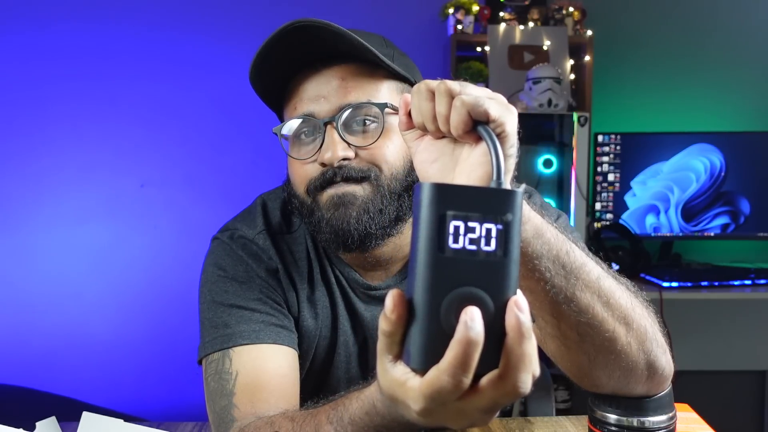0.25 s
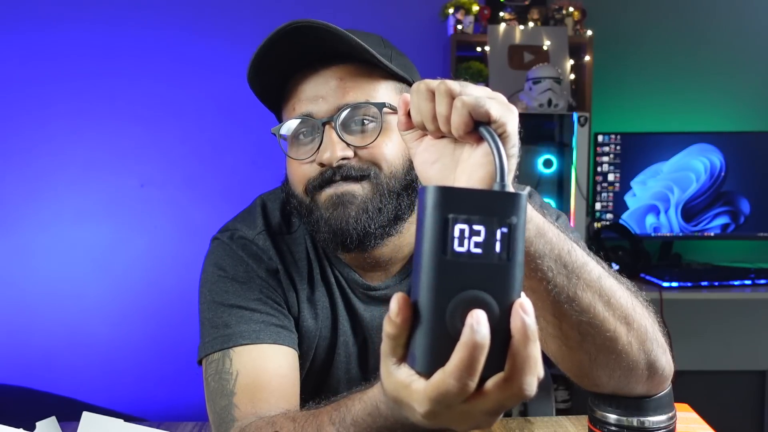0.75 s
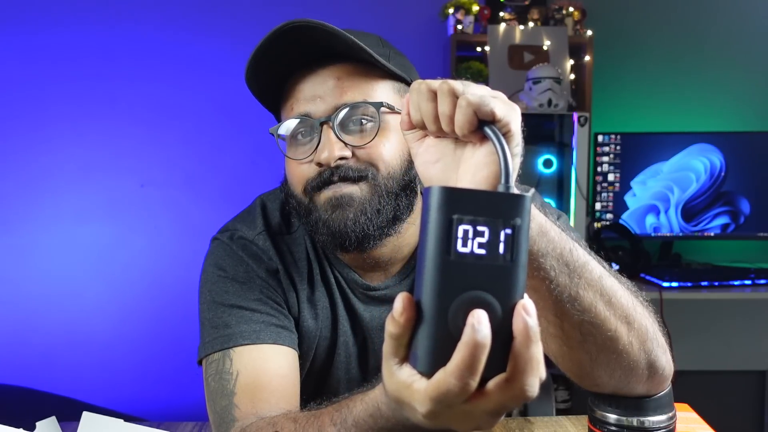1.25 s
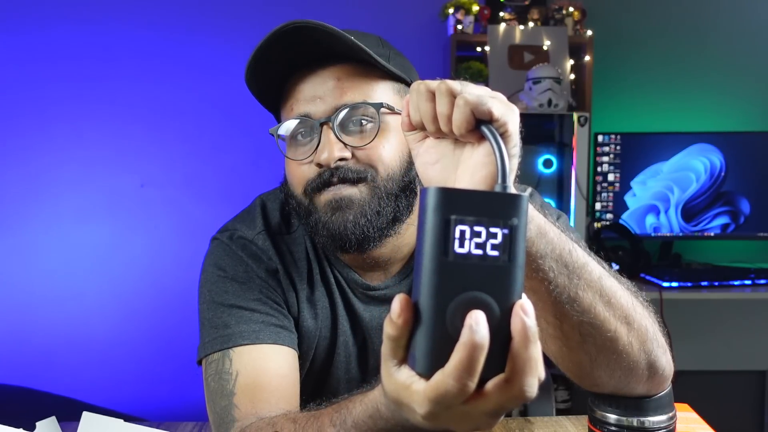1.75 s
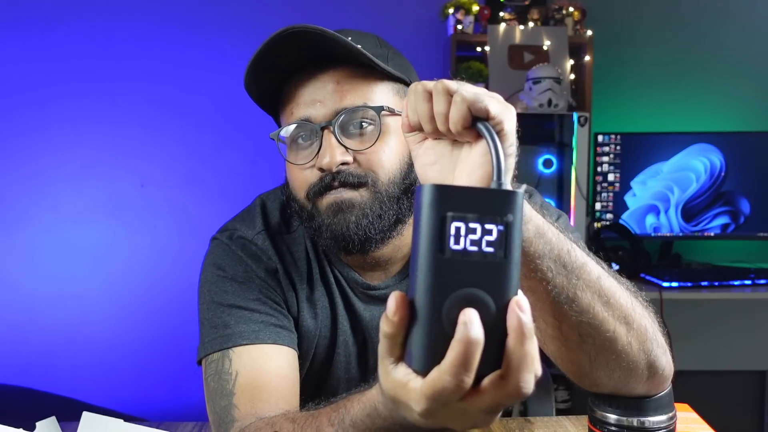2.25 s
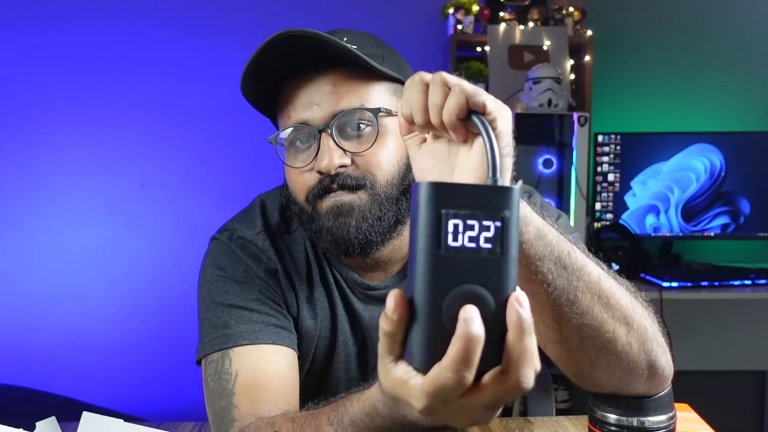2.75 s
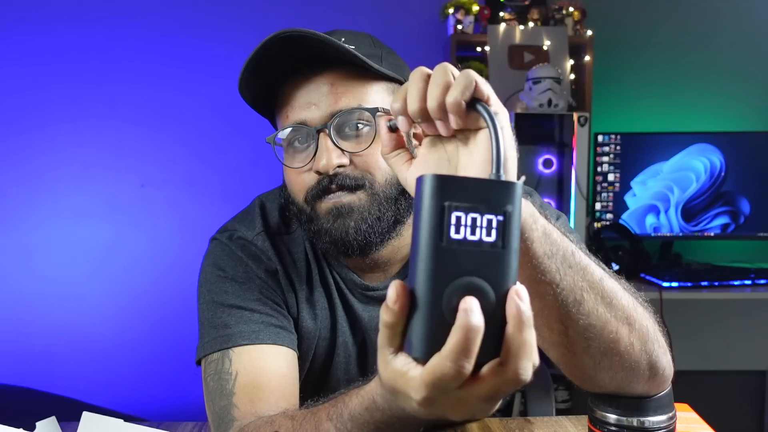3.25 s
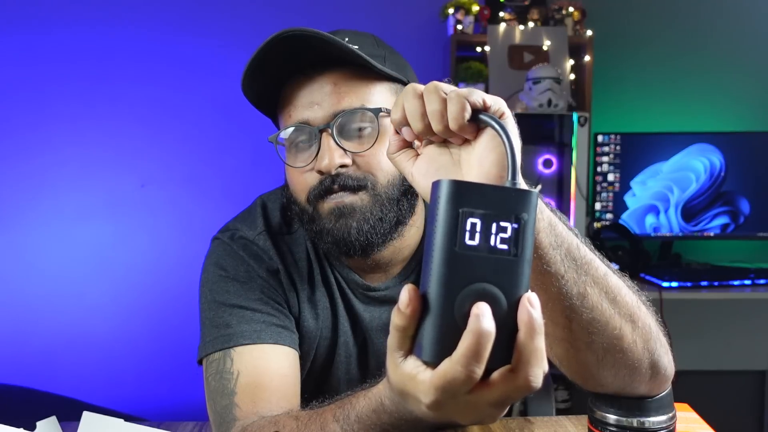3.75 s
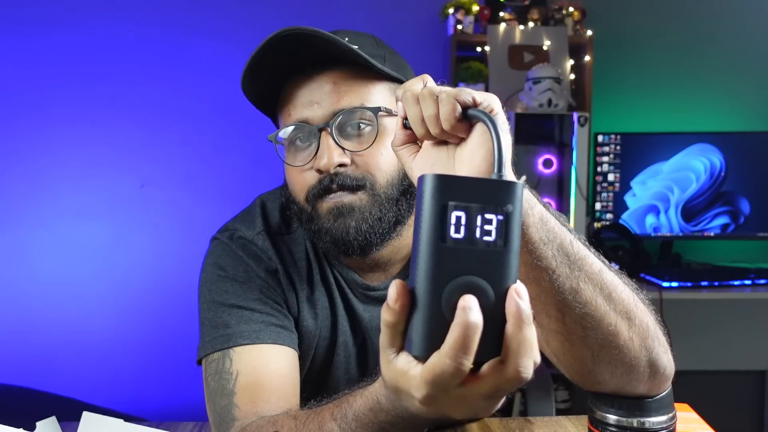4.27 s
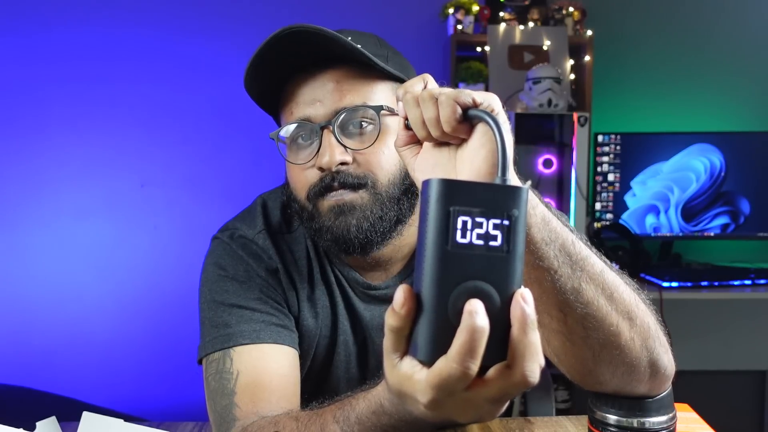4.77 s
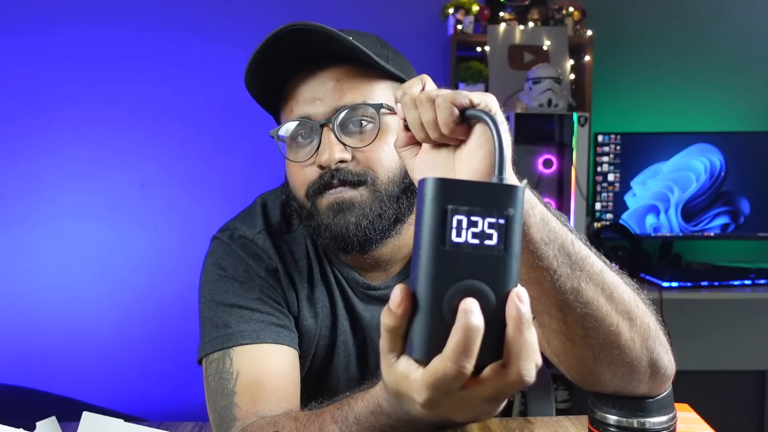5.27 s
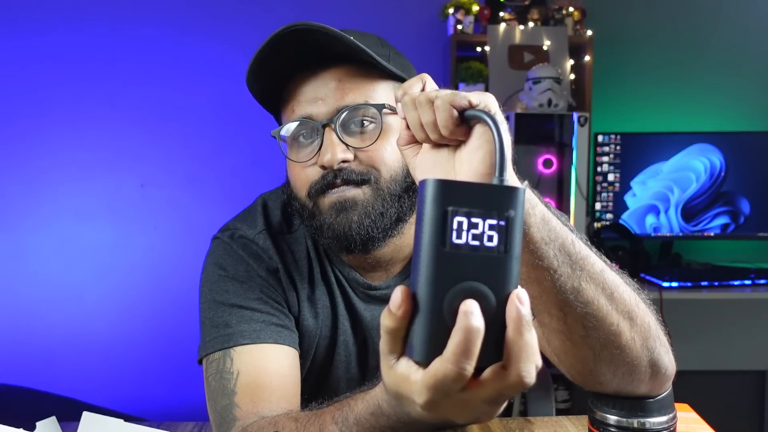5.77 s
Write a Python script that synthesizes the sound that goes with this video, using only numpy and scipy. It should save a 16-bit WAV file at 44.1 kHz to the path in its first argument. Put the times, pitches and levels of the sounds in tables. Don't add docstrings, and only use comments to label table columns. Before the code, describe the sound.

A small electric tyre pump runs very close in a room, a dense rattling buzz with a steady high whine, gear chatter and hissing air. Just before halfway the blocked hose is released for half a second: the motor rises slightly and air jets out. Then it is blocked again, and the buzz drops a little below its first pitch and continues to the end.

```python
import sys
import numpy as np
from scipy import signal
from scipy.fft import rfft, irfft, next_fast_len
from scipy.io import wavfile
from scipy.ndimage import uniform_filter1d, map_coordinates

SR = 44100
rng = np.random.default_rng(int(sys.argv[2]) if len(sys.argv) > 2 else 0)


def generate_wav(signal):
    frames = np.transpose(np.atleast_2d(signal))
    scaled = np.clip(frames, -1, 1) * 32767
    pcm = np.round(scaled).astype(np.int16)
    wavfile.write(sys.argv[1], SR, pcm)


def invert_db(x):
    u = np.asarray(x, float) / 20
    return 10 ** u


N = 265482
TIME = np.arange(N) / SR
REGRIP_S = 3.15
BLOCKED_SPEED = 36.5


def unit(x):
    return x / np.sqrt(np.mean(x ** 2) + 1e-20)


def along(points, hz):
    point_hz, value = np.transpose(points)
    return np.interp(np.log(hz + 1), np.log(point_hz + 1), value)


def curve(points):
    s, value = np.transpose(points)
    return np.interp(TIME, s, value)


def wobble(rate):
    coarse = TIME[::16]
    knots = rng.standard_normal(int(N * rate / SR) + 4)
    return np.interp(TIME, coarse, map_coordinates(knots, [coarse * rate]))


def filtered(x, response):
    size = next_fast_len(N + SR // 2)
    return irfft(rfft(x, size) * response(np.fft.rfftfreq(size, 1 / SR)), size)[:N]


def coloured(x, spectrum):
    return unit(filtered(x, lambda hz: invert_db(along(spectrum, hz))))


def resonant(x, modes):
    def response(f):
        total = 0
        for k, (hz, width, db) in enumerate(modes):
            total = total + (-1) ** k * invert_db(db) * 1j * f * width / (hz * hz - f * f + 1j * f * width)
        return total
    return filtered(x, response)


def bump(turn, angle, width):
    offset = (turn - angle + .5) % 1 - .5
    return np.exp(-.5 * (offset / width) ** 2)


def swells(turn, table, depth, scatter_db):
    gain = np.ones(N)
    for angle, width, db in table:
        luck = np.clip(rng.standard_normal(int(turn[-1]) + 3), -2, 2)
        chance = invert_db(scatter_db * luck)[(turn - angle + 1.5).astype(int)]
        gain += depth * (invert_db(db) - 1) * chance * bump(turn, angle, width)
    return gain


def by_grip(pair):
    return np.interp(TIME, [REGRIP_S, REGRIP_S + .3], pair)


def back_pressure():
    let_go_s, vent_s, block_s, refill_s, open_load = 2.74, .1, 3.26, .33, .05
    vent = np.exp(-np.clip(TIME - let_go_s, 0, None) / vent_s)
    refill = np.clip((TIME - block_s) / refill_s, 0, 1)
    load = np.maximum(np.maximum(vent, refill), open_load)
    return np.clip(uniform_filter1d(load, size=1500), 0, 1)


# (multiple of the crank rate, level blocked [dB],
# slope [dB per turn a second slower], level open [dB], lag when open [radians])
LOW_ORDERS = [(1, -50, -2, -58, 2), (2, -48, 0, -52, -0.5), (3, -54, -6, -49, -1.5),
              (4, -32.5, -10.5, -35, 3.14), (5, -49.5, 2, -34, 3.1), (6, -37, -6, -49, 0.5),
              (7, -53, 4, -39, -1), (8, -55, 7, -57, -3), (9, -47.5, 7.5, -46, 1.5),
              (10, -42, -5, -47, 3.5), (11, -38.5, 0, -37.5, 0), (12, -40, 1.5, -41, 2.5),
              (13, -39, -6, -54, 2)]


def low_orders(turn, speed, load, late):
    out = np.zeros(N)
    for k, blocked_db, slope_db, open_db, open_lag in LOW_ORDERS:
        k = round(k)
        thumb_db = (k < 4) * 30 * load * (1 - load)
        shake = invert_db(thumb_db + 0.85 * wobble(5))
        phase = 2 * np.pi * k * (turn - .1) - .0055 * (k - 11) ** 2 + 6.9 + k * late
        blocked = load * invert_db(blocked_db + slope_db * np.clip(BLOCKED_SPEED - speed, 0, None))
        opened = (1 - load) ** 2 * invert_db(open_db)
        out += shake * (blocked * np.cos(phase) + opened * np.cos(phase - open_lag))
    return out


# (frequency [Hz], level [dB])
PUSH_BLOCKED = [(480, -39.5), (620, -34), (700, -32), (750, -36.5), (950, -29), (1075, -23.5),
                (1180, -29.5), (1300, -63)]
PUSH_OPEN = [(520, -46), (610, -32.5), (700, -28), (790, -26), (1000, -30), (1180, -29), (1300, -60)]
# (frequency [Hz],
# width [Hz], level in first grip [dB], level with hose open [dB], level in second grip [dB])
STANDING_WAVES = [(544, 9.5, -29, -42, -40), (581.4, 10.2, -24.5, -40, -38), (650.7, 16, -24.5, -30, -28.5),
                  (784, 24, -22, -24, -17), (817.4, 21.5, -12, -27, -12), (852.5, 20, -17, -31, -12.5),
                  (879, 13, -11.5, -11.5, -17), (921, 25, -16.5, -29, -16), (990, 15, -16, -15, -20),
                  (1016, 21, -14, -32, -14), (1056, 12, -15, -28, -20), (1030, 8.5, -28, -28, -7),
                  (1102, 13, -12, -27, -18.5), (1599, 13.3, -20, -36, -16.5)]


def upper_orders(turn, speed, load, late):
    out = np.zeros(N)
    dip = invert_db(-3.5 * np.sin(np.pi * load) ** 2)
    lifts = []
    for centre, width, first_db, open_db, second_db in STANDING_WAVES:
        grip_db = np.where(TIME < REGRIP_S, first_db, second_db)
        lifts.append((centre, width, invert_db(2 * (load * grip_db + (1 - load) * open_db))))
    for k in [*range(14, 35), *range(43, 47)]:
        hz = k * speed
        power = invert_db(2 * along(PUSH_BLOCKED, hz)) * load ** 2
        power += invert_db(2 * along(PUSH_OPEN, hz)) * (1 - load) ** 2
        for centre, width, lift in lifts:
            if abs(centre - hz.mean()) < 90:
                power += lift / (1 + (2 * (hz - centre) / width) ** 2) ** 2
        lag = .0055 * (k - 11) ** 2 - 6.9 + .015 * k * rng.standard_normal()
        phase = 2 * np.pi * k * (turn - .1) - lag + k * late
        out += np.sqrt(power) * dip * invert_db(1.2 * wobble(5)) * np.cos(phase)
    return out


def hum(turn, speed, load, level):
    late = .004 * wobble(20)
    turn = turn + by_grip((.016, .028))
    orders = low_orders(turn, speed, load, late) + upper_orders(turn, speed, load, late)
    return invert_db(level + 3) * orders


# (frequency [Hz], width [Hz], level [dB])
MOTOR_CAN = [(3185, 130, 0), (3030, 240, -4), (3372, 90, 0)]


def whine(turn, speed, load, level):
    contacts_per_turn = 29.59
    early_turn = turn + by_grip((.04, .085))
    sweep = .2 + by_grip((.95, 1.36)) * load
    lead = sweep * np.cos(2 * np.pi * (turn - .855)) + .1 * wobble(15)
    contact = 2 * np.pi * contacts_per_turn * turn + lead

    pressure = bump(early_turn, 1.0, 0.095) + 0.57 * bump(early_turn, 0.753, 0.057)
    stroke = 0.06 + 0.032 * (1 - load) + load * pressure * invert_db(0.37 * wobble(24.8))
    third = resonant(stroke * np.sin(3 * contact), MOTOR_CAN)
    sparks = swells(early_turn, [(.93, 0.11, 8.6)], load, scatter_db=2) * rng.standard_normal(N)
    brush = resonant(sparks, MOTOR_CAN)
    whine_db = level - 5 + 3 * (1 - load) + 0.5 * (speed - BLOCKED_SPEED)

    grip_db = np.where(TIME < REGRIP_S, -16.5, -23.5)
    tone_db = level + load * grip_db + (1 - load) * -15.5
    tone = invert_db(tone_db + 0.92 * wobble(7.4)) * np.sin(contact)
    return invert_db(whine_db - 2.5) * unit(third) + invert_db(whine_db - 6.5) * unit(brush) + tone


# (crank angle [turns], level [dB], scatter [ms])
BLOWS_PER_TURN = [
    (.1, -3, 0.048),
    (0.0552, -14.5, 0.069),
    (.26, -7.5, 0.07),
    (.77, -7, .08),
    (.93, -11.5, .08),
]
# (frequency [Hz], width [Hz], level [dB])
SHELL_MODES = [(1273, 124, 2.5), (1373, 145, -0.5), (1654, 91, -4), (1804, 86, -4.5), (2210, 410, -3.5)]


def knock(turn, load, level):
    blows, count = np.zeros(N + SR), int(turn[-1])
    for angle, blow_db, scatter_ms in BLOWS_PER_TURN:
        chance = rng.standard_normal((count, 2))
        s = np.interp(np.arange(count) + angle, turn, TIME) + scatter_ms * chance[:, 0] / 1000
        at = np.round(np.abs(s) * SR).astype(int)
        blows[at] += invert_db(blow_db + 1.5 * chance[:, 1]) * (.4 + .6 * load[at])
    ring = resonant(blows[:N], SHELL_MODES)
    ring = signal.sosfilt(signal.butter(4, 1150, "high", fs=SR, output="sos"), ring)
    return invert_db(level - 11) * unit(ring)


# (crank angle [turns], width [turns], level over the steady part [dB])
GEAR_SWELLS = [
    (.12, 0.1, 3.5),
    (.9, 0.087, 2),
]
# (frequency [Hz], level [dB per Hz])
GEAR_COLOUR = [(24, -75), (45, -48), (145, -43), (275, -34.5), (400, -30), (485, -31.5), (716, -12.5),
               (825, -1.5), (1060, -2.5), (1620, -4), (2650, -8), (3150, -5.5), (4100, -15), (5600, -26)]


def rattle(turn, load, level):
    chatter = swells(turn, GEAR_SWELLS, 0.42 + 0.31 * load, scatter_db=1.5) * invert_db(1.23 * wobble(250))
    return invert_db(level - 5) * coloured(chatter * rng.standard_normal(N), GEAR_COLOUR)


# (crank angle [turns], width [turns], level over the steady part [dB])
HISS_SWELLS = [(.05, 0.026, 6.5), (.15, 0.037, 5.5), (.25, 0.038, 2.2), (.72, 0.042, 1.7), (.9, 0.18, 1.9)]
# (frequency [Hz], level [dB per Hz])
HISS_COLOUR = [(2060, -32.5), (3500, -11.5), (3590, -8.5), (4540, -2.5), (5310, -3.5), (5770, -8),
               (6320, -4.5), (6840, -8), (7270, -7), (8320, -5.5), (9440, -10.5), (9900, -25), (12900, -46),
               (21800, -120)]
FIZZ_COLOUR = [(5880, -32), (10000, -3), (10400, -10), (12100, -3), (12700, 4), (13200, 5), (14200, -7),
               (15500, -12)]
# (frequency [Hz], width [Hz], level [dB])
SHELL_CAVITIES = [(1610, 60, 1), (4470, 180, -10), (6510, 200, -5.5), (8430, 220, -13), (9430, 250, -6.5),
                  (13060, 450, -1)]


def intake(turn):
    hiss = swells(turn, HISS_SWELLS, 0.75, scatter_db=0.5) * invert_db(0.88 * wobble(300))
    hiss = hiss * rng.standard_normal(N)
    out = invert_db(-1.5) * coloured(hiss, HISS_COLOUR) + invert_db(-14.5) * coloured(hiss, FIZZ_COLOUR)
    return out + invert_db(-19) * unit(resonant(hiss, SHELL_CAVITIES))


# (crank angle [turns], width [turns], frequency [Hz], resonance width [Hz], level [dB])
VALVE_PUFFS = [(0.71, 0.021, 7960, 810, -11.5), (0.15, 0.036, 7300, 330, -15),
               (0.83, 0.024, 9130, 530, -25), (0.92, 0.035, 6800, 210, -23.5)]


def valves(turn):
    out = np.zeros(N)
    for angle, width, hz, width_hz, puff_db in VALVE_PUFFS:
        puff = (swells(turn, [(angle, width, 6)], 1, scatter_db=2) - 1) * rng.standard_normal(N)
        puff = resonant(puff, [(hz, width_hz, 0)])
        out += invert_db(puff_db) * unit(resonant(puff, [(hz, 2 * width_hz, 0)]))
    return out


# (frequency [Hz], level [dB per Hz])
JET_COLOUR = [(5000, -28), (7000, -4), (8500, 2.5), (10300, -14), (12000, -18), (15000, -30)]


def hose_jet(turn, load):
    pulses = swells(turn, [(.95, 0.067, 16)], 0.87, scatter_db=2) * invert_db(4.2 * wobble(400))
    jet = unit(pulses * coloured(rng.standard_normal(N), JET_COLOUR))
    spurt_s, spurt_width_s = 3.11, .055
    spurt = invert_db(-5) * np.exp(-((TIME - spurt_s) / spurt_width_s) ** 4)
    return (invert_db(-7) * np.sqrt(1 - load) + spurt) * jet


def air(turn, load, level):
    return invert_db(level - 7.5) * (intake(turn) + valves(turn) + hose_jet(turn, load))


def thump():
    start_s, hz, db, t60_s = .275, 138, -40, .25
    t = np.clip(TIME - start_s, 0, None)
    return invert_db(db - 60 * t / t60_s) * (1 - np.exp(-t / 0.016)) * np.sin(2 * np.pi * hz * t)


# (frequency [Hz], decay by 60 dB [s])
ROOM_DECAY = [(200, 0.45), (2000, 0.29), (10000, 0.15)]


def room(x):
    hz, t, z = signal.stft(rng.standard_normal(SR // 2), SR, nperseg=256)
    decay = invert_db(-60 * t / along(ROOM_DECAY, hz)[:, None])
    tail = signal.istft(z * decay, SR, nperseg=256)[1]
    delayed = np.pad(x, (300, 0))
    return signal.fftconvolve(delayed, tail / np.linalg.norm(tail))[:N]


def mains():
    return invert_db(-72) * np.sin(2 * np.pi * 50 * TIME)


# (time [s], crank rate [turns per second])
CRANK_SPEED = [(0, 36.296), (.3, 36.48), (1, 36.625), (1.75, 36.77), (2.05, 36.715), (2.62, 36.695),
               (2.72, 36.93), (2.92, 37.76), (3.08, 38.2), (3.22, 38.32), (3.34, 38.0), (3.62, 36.14),
               (3.76, 35.75), (4, 35.6), (4.65, 35.785), (5.2, 35.69), (5.7, 35.49), (6.02, 35.32)]
# (time [s], level [dB])
HAND_LEVEL = [(0, -13.5), (.5, -15), (1, -15.7), (1.2, -17), (1.85, -17.5), (2.1, -16.5), (2.4, -17.5),
              (2.8, -17.5), (3.1, -16.5), (3.35, -17), (3.6, -16.5), (4, -17.5), (4.3, -17), (4.45, -18),
              (4.9, -18), (5.2, -17.5), (5.75, -17), (6.02, -18.5)]


def scene():
    speed, level, load = curve(CRANK_SPEED), curve(HAND_LEVEL), back_pressure()
    turn = .14 + np.cumsum(speed) / SR
    motor = hum(turn, speed, load, level) + whine(turn, speed, load, level)
    pump = knock(turn, load, level) + rattle(turn, load, level) + air(turn, load, level)
    return (motor + pump + thump() + invert_db(-10) * room(pump) + mains())[None]


def roll_off(x):
    return signal.sosfilt(signal.butter(12, 15610, fs=SR, output="sos"), x)


def record(dry):
    soft = dry / (1 + np.abs(dry / .95) ** 4) ** (1 / 4)
    return roll_off(soft)


dry = scene()
out = record(dry)
generate_wav(out)
```